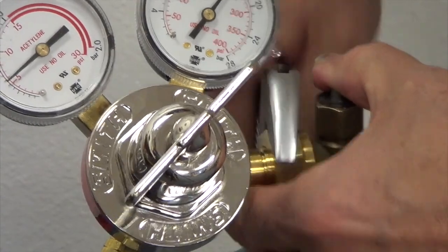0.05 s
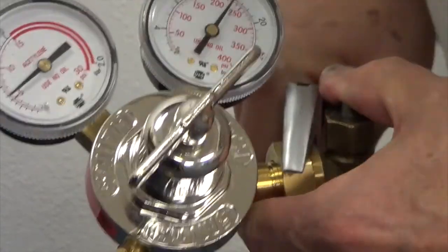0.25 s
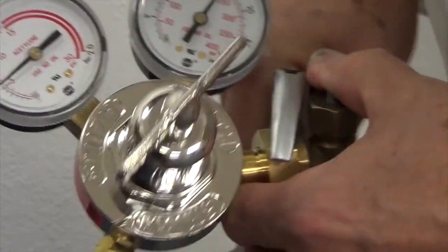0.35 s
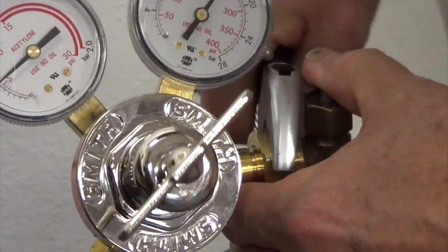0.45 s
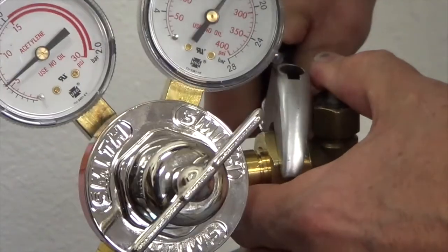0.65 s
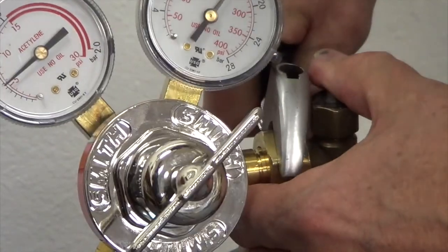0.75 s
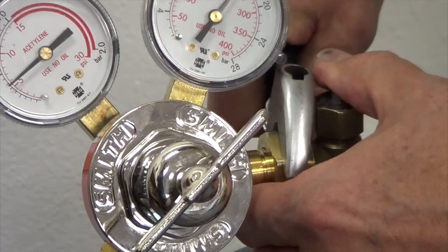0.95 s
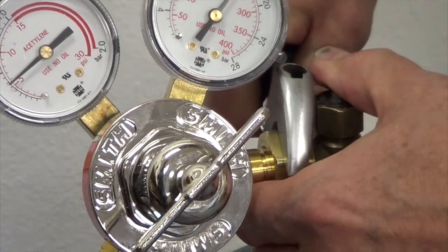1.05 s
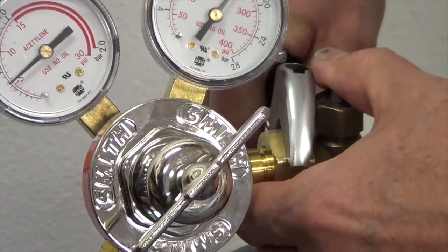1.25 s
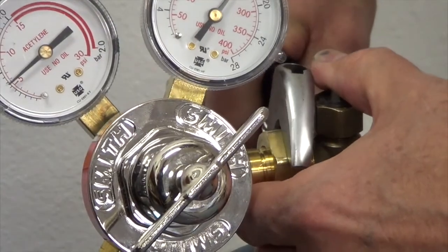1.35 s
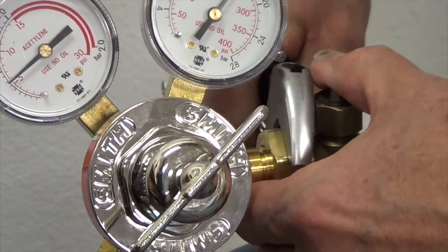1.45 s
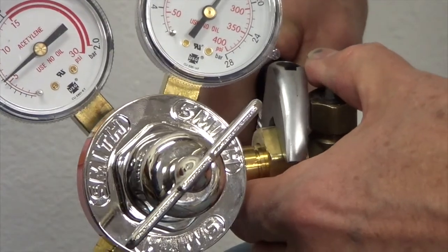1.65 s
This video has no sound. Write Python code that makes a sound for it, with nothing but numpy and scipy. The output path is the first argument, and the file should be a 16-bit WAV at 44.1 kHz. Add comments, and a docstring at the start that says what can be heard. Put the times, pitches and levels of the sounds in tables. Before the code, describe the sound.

Gas hisses briefly from a valve and cuts off, followed by small metallic knocks.

```python
"""Gas cylinder cracked open and shut

Close up in a small workshop, gas seeps past a valve seat, bursts into a bright hiss for a third
of a second and is cut off. The spindle clacks, hands bump the valve, the threads tick and a last
leak whistles faintly; then a wrench scrapes and knocks on the regulator's fittings.
The room answers briefly over a quiet background."""
import sys
import numpy as np
from scipy import signal
from scipy.fft import rfft, irfft, next_fast_len
from scipy.io import wavfile
from scipy.ndimage import map_coordinates

SR = 44100
rng = np.random.default_rng(int(sys.argv[2]) if len(sys.argv) > 2 else 0)


def file_out(sig):
    """Save sig as 16-bit WAV at sys.argv[1]."""
    # one column per channel
    cols = np.atleast_2d(sig).T
    # limit, then scale
    lim = np.clip(cols, -1, 1)
    pcm = np.round(lim * 32767).astype(np.int16)
    wavfile.write(sys.argv[1], SR, pcm)


N = 74970

# envelope of the gas burst: time_s, level_db
JET_ENVELOPE = [(.078, -72), (.084, -57.5), (.133, -55), (.138, -41), (.149, -35), (.164, -19),
                (.21, -17.5), (.272, -16.5), (.38, -17.5), (.462, -17), (.474, -24.5), (.484, -34.5),
                (.51, -64)]
# colour of the hiss as the gap opens, at its widest and as it closes: freq_hz, level_db
OPENING_COLOUR = [(30, -44), (200, -38), (500, -29.5), (900, -19), (1250, -21), (1600, -19.5), (2100, -22),
                  (2750, -15.5), (3150, -14), (3550, -8), (4400, -2.5), (5200, -9.5), (6300, -3.5),
                  (7300, -12), (8100, -6), (8500, -5.5), (9000, -0.5), (10300, -2.5), (12000, -15),
                  (13000, -12.5), (15700, -19)]
WIDEST_COLOUR = [(30, -43), (200, -36), (500, -27.5), (900, -22.5), (1500, -20.5), (2400, -24), (3300, -15),
                 (4000, -5), (4600, -12.5), (5100, -3.5), (5400, -5.5), (6200, 0.5), (7100, -6.5),
                 (7550, -6), (8100, -2.5), (9000, 0.5), (10900, -2.5), (12000, -14), (13500, -12),
                 (15700, -21)]
CLOSING_COLOUR = [(30, -62), (200, -33.5), (500, -30), (900, -23), (1700, -21), (2130, -18), (2450, -23.5),
                  (3300, -14.5), (4050, -3), (4800, -12), (5800, -1.5), (6500, -1), (7400, -7.5),
                  (7950, -2.5), (9000, -1.5), (10100, -4), (11400, -4.5), (12400, -11.5), (15700, -14.5)]
# when each colour is reached: opening_s, widest_s, closing_s
COLOUR_TIMES = (.23, 0.312, 0.392)
# how centred the gas sounds: freq_hz, left_right_correlation
GAS_CORRELATION = [(100, .98), (600, .9), (1400, .95), (3000, .955), (12000, .95)]
# where the gas sits: freq_hz, left_minus_right_db
GAS_PAN = [(100, -3), (1000, 7), (3000, 1), (12000, -0.5)]
# colour of the leak before the burst: freq_hz, level_db
SEEP_COLOUR = [(150, -12), (450, -11), (900, -8.5), (1300, -6), (1460, 4), (1650, -5), (2100, -7),
               (3000, -23), (5000, -13.5), (9000, -16), (15000, -23.5)]
# wrench hits on the fittings: start_s, level_db, cutoff_hz, rise_s
WRENCH_HITS = [(1.082, -43, 1600, 0.0022), (1.1725, -28.5, 1200, 0.0018), (1.1762, -24.5, 11100, 0.00071),
               (1.24, -38, 3500, 0.00085), (1.281, -27, 2480, 0.00028), (1.3199, -30.5, 1720, 0.0013)]
# ring of regulator and wrench: pitch_hz, level_db, t60_s
METAL_MODES = [(558, -12.5, 0.11), (628, -18, 0.11), (867, -8, 0.046), (975, -3.5, .05), (1065, -2, 0.057),
               (1270, -15, 0.037), (1490, -3.5, 0.047), (1602, -5, .05), (2117, -5, 0.051),
               (2580, -11, 0.057), (2945, -13, 0.08), (4150, -11, 0.046), (4520, -9, .04),
               (4793, -7.5, 0.082), (5130, -12, 0.047)]
# noisy attack of a hit: freq_hz, level_db
CRACK_COLOUR = [(200, -26), (400, -15), (600, -11.5), (1050, -3), (1550, 1), (1850, -10), (2200, -7.5),
                (3000, -9.5), (3500, -11), (4800, -11.5), (6000, -11), (9000, -13.5), (15000, -29.5)]
# spindle clacks: start_s, level_db
SPINDLE_HITS = [(.0805, -45.5), (.277, -22), (0.2884, -33.5)]
# ring of the valve body: pitch_hz, level_db, t60_s
VALVE_MODES = [(464, -9, 0.096), (927, -13, 0.064), (1114, -3.5, .04), (1396, 0, 0.042), (1600, -16, .03)]
# hand on the handwheel: start_s, level_db, pitch_hz, t60_s
HAND_HITS = [(.36, -42, 313, 0.064), (.482, -40.5, 372.5, 0.095), (.507, -46, 385, 0.16),
             (0.5444, -32.5, 560, 0.026), (.562, -45, 488, 0.034), (.593, -50, 580, 0.035),
             (.762, -41.5, 324, 0.036)]
# partials of a bump: pitch_ratio, level_db
BUMP_PARTIALS = [(.68, -12.5), (1.001, 0.5), (1.22, -13)]
# ticks of the threads: start_s, level_db
THREAD_TICKS = [(0.052, -50.5), (.569, -39.5), (1.082, -49.5)]
# colour of a tick: freq_hz, level_db
TICK_COLOUR = [(500, -15), (3500, -10), (6500, -2), (10500, -6.5), (13000, -19), (16000, -25)]
# slips of the wrench as it is seated: start_s, level_db
WRENCH_SLIPS = [(1.115, -48), (1.136, -48), (1.148, -52), (1.161, -52.5)]
# colour of a slip: freq_hz, level_db
SLIP_COLOUR = [(40, -20), (80, -6), (200, -13), (450, -1.5), (750, 2.5), (1150, -5.5), (1800, -17.5),
               (5000, -19), (12000, -34)]
# length of the reverb: freq_hz, t60_s
REVERB_DECAY = [(200, 0.8), (1000, 0.49), (4000, .38), (9000, 0.3), (15000, 0.16)]
# colour of the reverb: freq_hz, level_db
REVERB_COLOUR = [(200, 7), (1000, 5), (1700, 6), (2500, 7.5), (4000, 0.5), (6000, -3.5), (10000, -1.5),
                 (15000, -2)]
# colour of the room tone: freq_hz, level_db
ROOM_TONE_COLOUR = [(25, -21), (70, -22), (150, -6), (240, -6), (400, -6.5), (700, -6), (1500, -12.5),
                    (3000, -15), (6000, -19), (9000, -25), (12000, -24), (15800, -26)]
# how centred the room tone sounds: freq_hz, left_right_correlation
ROOM_TONE_CORRELATION = [(100, .93), (200, 0.99), (400, 0.62), (800, 0.09), (2400, 0.14), (4400, 0.42),
                         (8000, 0.42), (15000, 1)]
# faint whines in the room tone: centre_hz, width_hz, level_db
WHINE_BANDS = [(3964, 120, -76.5), (6050, 200, -73.5), (13100, 400, -73)]

KNOCK_PAN_DB, SOFT_PAN_DB = 5.5, 4  # hard and soft contacts both sit to the left


def amp(db):
    """Decibels to gain."""
    return 10 ** (np.asarray(db) / 20)


def unit(x):
    """Scale to rms 1."""
    return x / np.sqrt(np.mean(x ** 2) + 1e-20)


def along(points, hz):
    """Read a curve of (freq_hz, value) points on a log frequency axis."""
    freqs, values = np.transpose(points)
    return np.interp(np.log(hz + 1), np.log(freqs + 1), values)


def pan(db):
    """Left and right gains, the left louder by db."""
    return amp(np.array([[.5], [-.5]]) * db)


def attack(t, rise_s):
    """Exponential fade-in."""
    return 1 - np.exp(-t / rise_s)


def filtered(x, response):
    """EQ x with a gain given as a function of frequency."""
    n = x.shape[-1]
    padded = next_fast_len(n + SR // 4)
    return irfft(rfft(x, padded) * response(np.fft.rfftfreq(padded, 1 / SR)), padded)[..., :n]


def noise(colour, size):
    """Coloured mono noise of rms 1."""
    return unit(filtered(rng.standard_normal(size), lambda hz: amp(along(colour, hz))))


def narrow_noise(centre_hz, width_hz):
    """A wavering tone of rms 1: noise through one narrow peak."""
    white = rng.standard_normal(N)
    return unit(filtered(white, lambda hz: 1 / (1 + (2 * (hz - centre_hz) / width_hz) ** 2)))


def stereo_noise(colour, correlation):
    """Coloured noise of rms 1, wider where the correlation is low."""
    def mid_side_gains(hz):
        angle = np.arccos(np.clip(along(correlation, hz), -1, 1)) / 2
        return amp(along(colour, hz)) * [np.cos(angle), np.sin(angle)]
    mid, side = filtered(rng.standard_normal((2, N)), mid_side_gains)
    return unit(np.array([mid + side, mid - side]))


def add(track, start_s, sound):
    """Mix a sound into a track."""
    part = track[max(round(start_s * SR), 0):][:len(sound)]
    part += sound[:len(part)]


def jet(flutter_db=0.3, flutter_per_s=120):
    """Turbulent gas rings the valve's passages; their resonances shift as the spindle turns."""
    t = np.arange(N) / SR
    flutter = map_coordinates(rng.standard_normal(N), [t * flutter_per_s], order=1)
    level = amp(np.interp(t, *np.transpose(JET_ENVELOPE)) + flutter_db * flutter)
    hiss = np.zeros((2, N))
    for colour, share in zip((OPENING_COLOUR, WIDEST_COLOUR, CLOSING_COLOUR), np.eye(3)):
        crossfade = np.sqrt(np.interp(t, COLOUR_TIMES, share))  # equal power
        hiss += crossfade * stereo_noise(colour, GAS_CORRELATION)
    return filtered(level * hiss, lambda hz: pan(along(GAS_PAN, hz)))


def seep(start_s=0.077, end_s=0.18, fade_s=0.0035, level_db=-51.5):
    """A thin, breathy leak with a hollow resonance as the seat first lifts."""
    t = np.arange(N) / SR
    gate = np.clip(np.minimum(t - start_s, end_s - t) / fade_s, 0, 1)
    breath = stereo_noise(SEEP_COLOUR, GAS_CORRELATION)
    return amp(level_db) * gate * filtered(breath, lambda hz: pan(along(GAS_PAN, hz)))


def wrench_knocks(ring_db=-6.5, crack_db=-3, crack_t60_s=0.049, rebound_s=.004, rebound_db=-8):
    """Each knock cracks, rings the hand-damped metal and chatters in two weaker rebounds."""
    track, t = np.zeros(N), np.arange(SR // 4) / SR
    for start_s, db, cutoff_hz, rise_s in WRENCH_HITS:
        for bounce in range(3):
            ring = np.zeros(len(t))
            for hz, mode_db, t60 in METAL_MODES:
                decay = amp(mode_db + rng.normal(0, 1) - 60 * t / t60)
                ring += decay * np.sin(2 * np.pi * (hz * t + rng.random()))
            crack = noise(CRACK_COLOUR, len(t)) * amp(crack_db - 60 * t / crack_t60_s)
            blow = (amp(ring_db) * ring + crack) * attack(t, rise_s)
            blow = filtered(blow, lambda hz: (1 + 1j * hz / cutoff_hz) ** -2)  # soft hits are duller
            delay_s = bounce * rebound_s * rng.uniform(.8, 1.2)
            add(track, start_s + delay_s, amp(db + bounce * rebound_db) * blow)
    return track * pan(KNOCK_PAN_DB)


def spindle_clacks():
    """The spindle takes up its play and briefly rings the valve body."""
    track, t = np.zeros(N), np.arange(SR // 5) / SR
    ring = sum(amp(db - 60 * t / t60) * np.sin(2 * np.pi * hz * t) for hz, db, t60 in VALVE_MODES)
    for start_s, db in SPINDLE_HITS:
        add(track, start_s, amp(db) * ring * attack(t, rise_s=0.00085))
    return track * pan(KNOCK_PAN_DB)


def hand_bumps():
    """A soft hand on the handwheel sounds only a few low modes."""
    track, t = np.zeros(N), np.arange(SR // 4) / SR
    for start_s, db, hz, t60 in HAND_HITS:
        ring = sum(amp(level) * np.sin(2 * np.pi * hz * ratio * t) for ratio, level in BUMP_PARTIALS)
        add(track, start_s, ring * amp(db - 60 * t / t60) * attack(t, rise_s=0.0006))
    return track * pan(SOFT_PAN_DB)


def thread_ticks(t60_s=0.021):
    """Tiny bright clicks as the threads slip."""
    track, t = np.zeros(N), np.arange(SR // 10) / SR
    for start_s, db in THREAD_TICKS:
        add(track, start_s, noise(TICK_COLOUR, len(t)) * amp(db - 60 * t / t60_s))
    return track


def wrench_slips(t60_s=0.09):
    """The wrench scrapes over the nut in short dull rubs."""
    track, t = np.zeros(N), np.arange(SR // 5) / SR
    for start_s, db in WRENCH_SLIPS:
        envelope = amp(db - 60 * t / t60_s) * attack(t, rise_s=0.001)
        add(track, start_s, noise(SLIP_COLOUR, len(t)) * envelope)
    return track * pan(SOFT_PAN_DB)


def leak_whistle(start_s=0.72, peak_s=1.05, end_s=1.1, level_db=-70.5):
    """A last faint leak whistles at the closed valve, swells and stops."""
    swell = np.sqrt(np.interp(np.arange(N) / SR, [start_s, peak_s, end_s], [0, 1, 0]))
    return amp(level_db) * narrow_noise(centre_hz=4740, width_hz=240) * swell


def early_reflections(x, count=6, each_db=-20.5, within_s=.014):
    """Weak slaps off the wall and cylinder comb the spectrum."""
    delays = within_s * rng.uniform(.2, 1, count)
    return filtered(x, lambda hz: 1 + amp(each_db) * sum(np.exp(-2j * np.pi * hz * d) for d in delays))


def reverb(x, width=0.48):
    """The workshop's short tail, dying fastest in the treble."""
    hz, t, bands = signal.stft(rng.standard_normal((2, SR // 2)), SR, nperseg=256)
    decay = amp(along(REVERB_COLOUR, hz)[:, None] - 60 * t / along(REVERB_DECAY, hz)[:, None])
    mid, side = signal.istft(bands * decay * attack(t, rise_s=0.0032), SR)[1]
    tail = np.array([mid + width * side, mid - width * side])
    tail /= np.linalg.norm(tail[0])
    return signal.fftconvolve(x.mean(axis=0)[None], tail, axes=1)[:, :N]


def room_tone(bed_db=-59.5):
    """A steady bed of room noise and hiss with a few faint whines."""
    whine = sum(amp(db) * narrow_noise(hz, width_hz) for hz, width_hz, db in WHINE_BANDS)
    return amp(bed_db) * stereo_noise(ROOM_TONE_COLOUR, ROOM_TONE_CORRELATION) + whine


def scene(gas_send_db=-16.5, handling_send_db=-16, low_cut_hz=230):
    """Gas and handling, each with its reverb send, over the room tone."""
    gas = early_reflections(jet() + seep()) + leak_whistle()
    contacts = wrench_knocks() + spindle_clacks() + hand_bumps() + thread_ticks()
    low_cut = signal.butter(3, low_cut_hz, "high", fs=SR, output="sos")  # small parts give little bass
    handling = signal.sosfilt(low_cut, contacts) + wrench_slips()
    wet = amp(gas_send_db) * reverb(gas) + amp(handling_send_db) * reverb(handling)
    return gas + handling + wet + room_tone()


def record(dry):
    """A brick-wall high cut at 15.8 kHz."""
    return filtered(dry, lambda hz: hz < 15800)


dry = scene()
out = record(dry)
file_out(out)
```